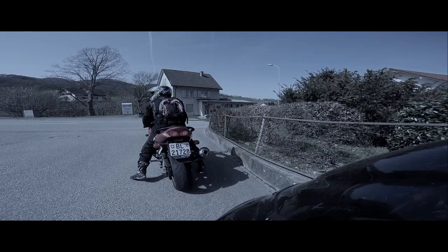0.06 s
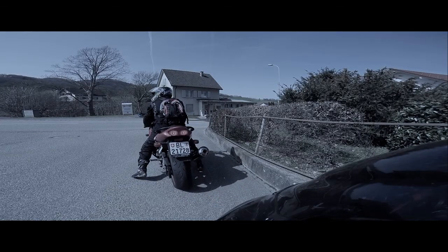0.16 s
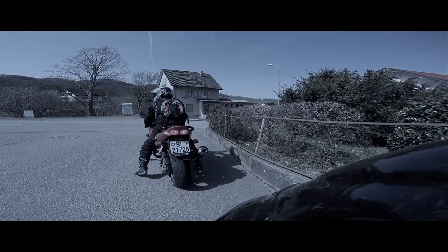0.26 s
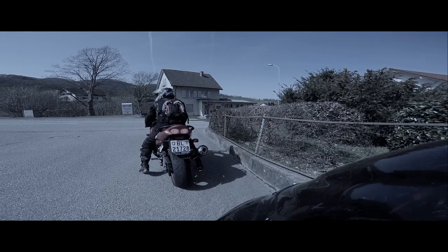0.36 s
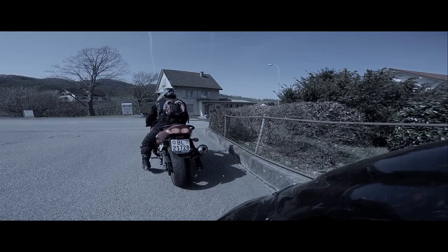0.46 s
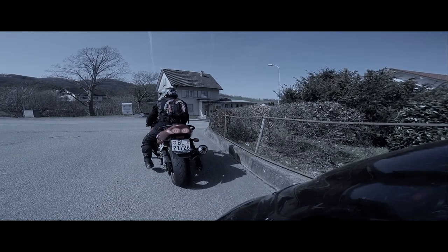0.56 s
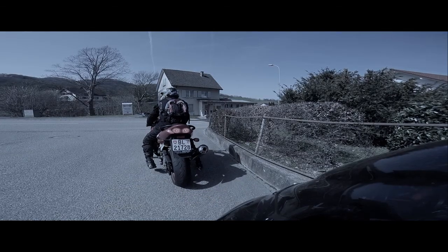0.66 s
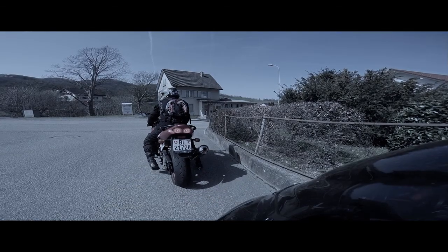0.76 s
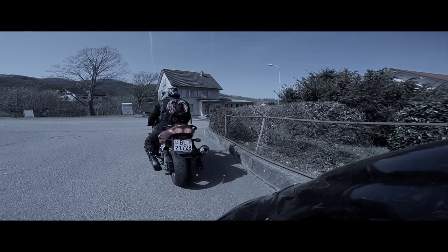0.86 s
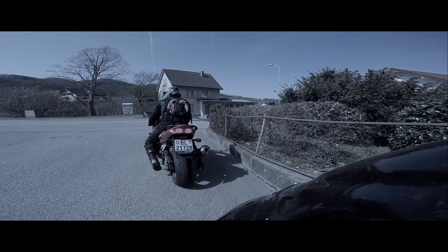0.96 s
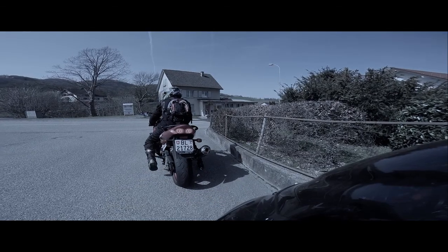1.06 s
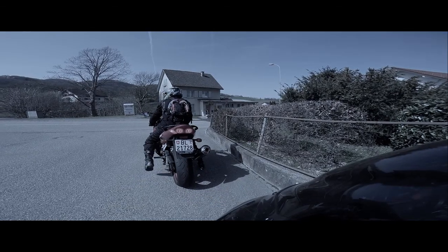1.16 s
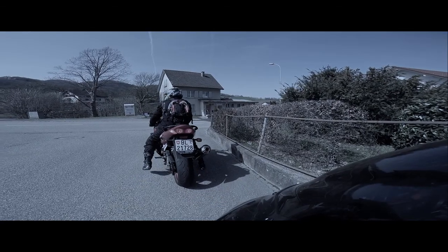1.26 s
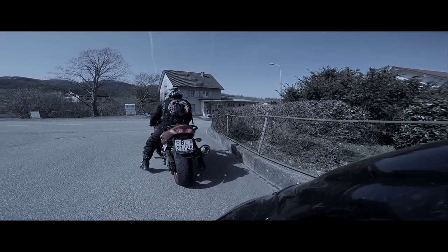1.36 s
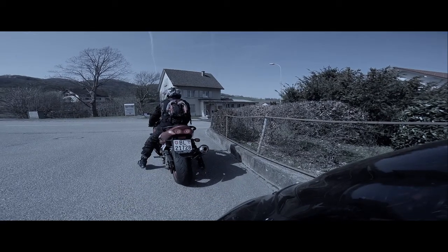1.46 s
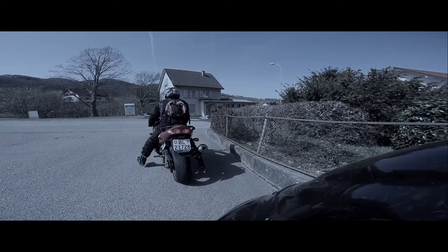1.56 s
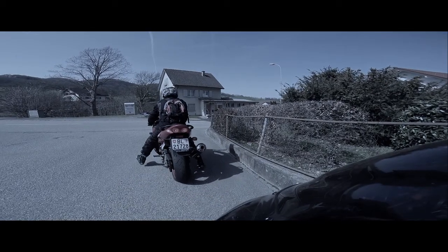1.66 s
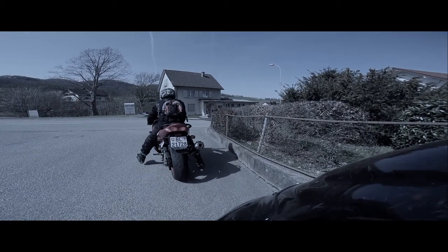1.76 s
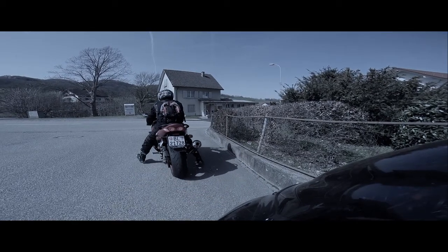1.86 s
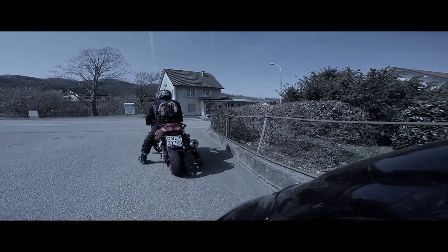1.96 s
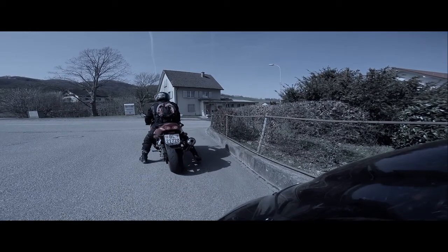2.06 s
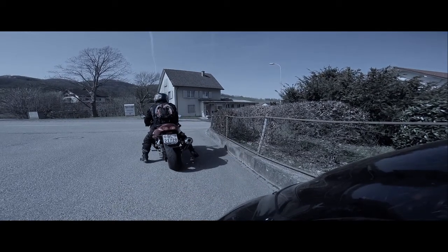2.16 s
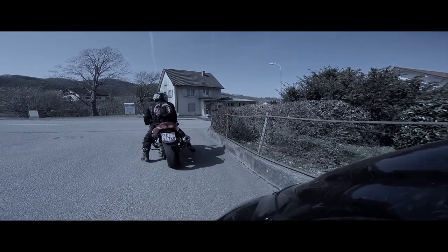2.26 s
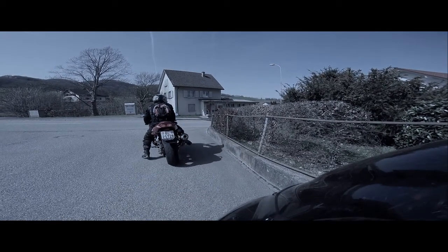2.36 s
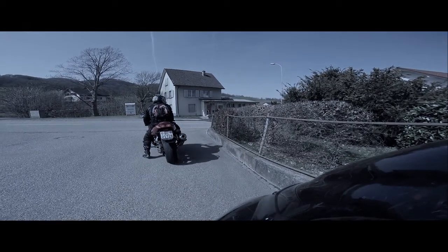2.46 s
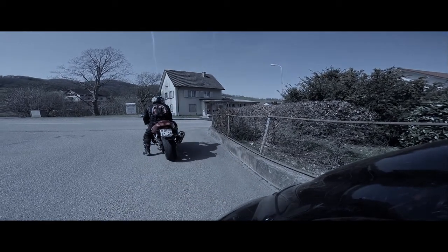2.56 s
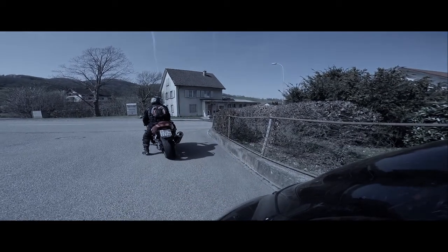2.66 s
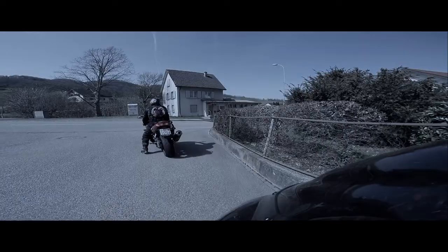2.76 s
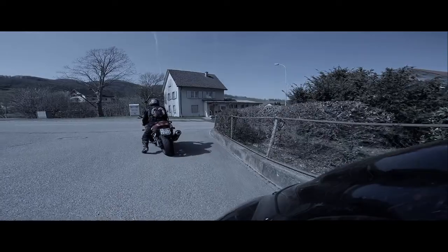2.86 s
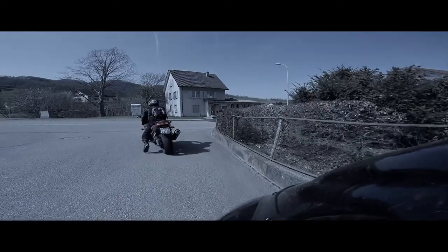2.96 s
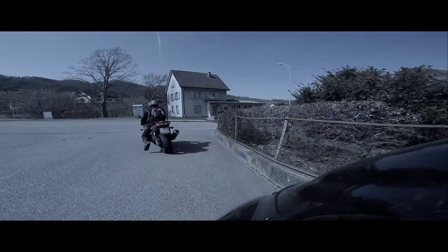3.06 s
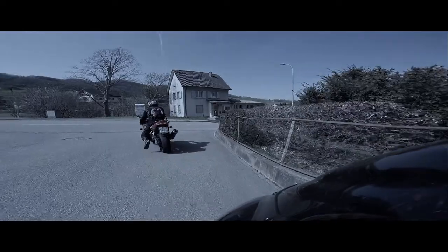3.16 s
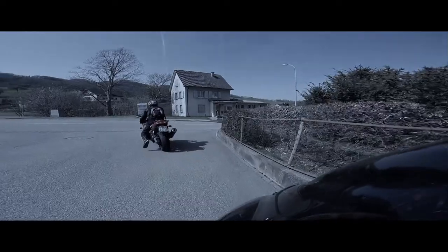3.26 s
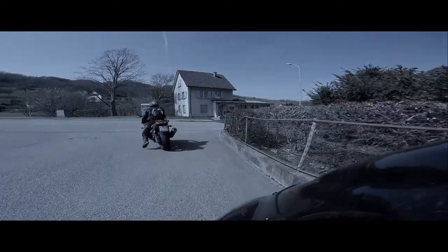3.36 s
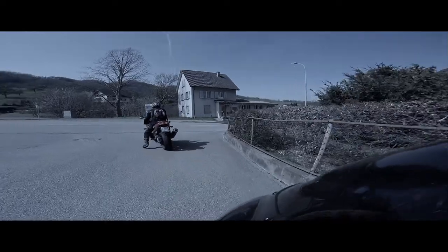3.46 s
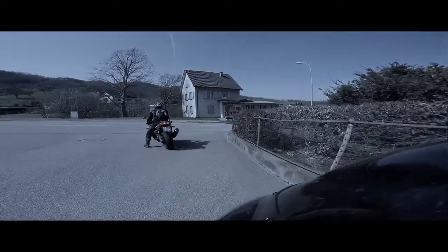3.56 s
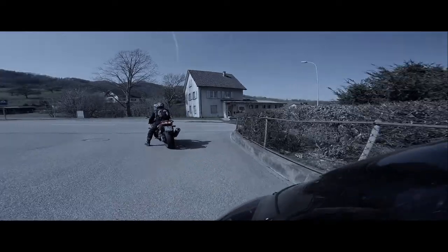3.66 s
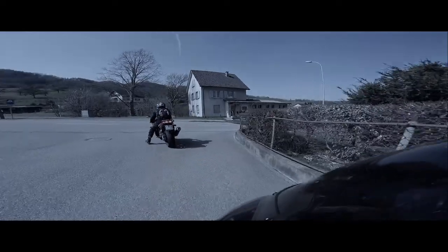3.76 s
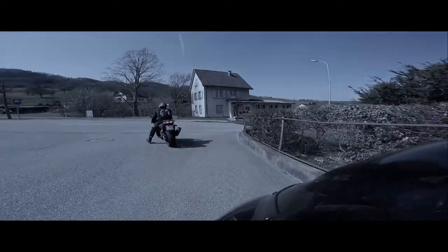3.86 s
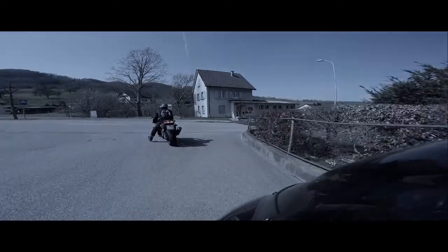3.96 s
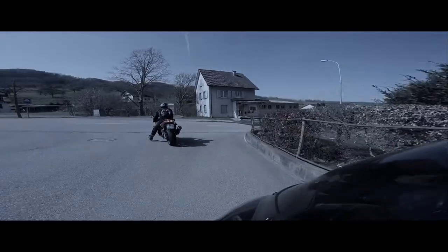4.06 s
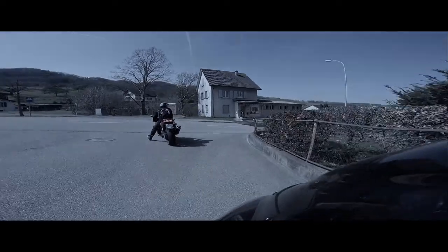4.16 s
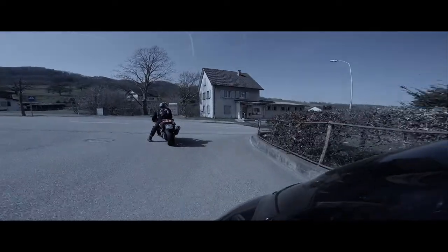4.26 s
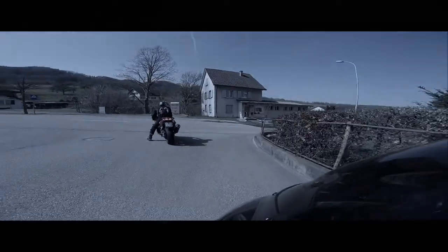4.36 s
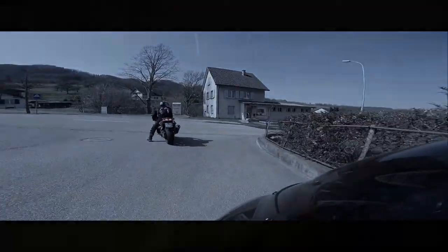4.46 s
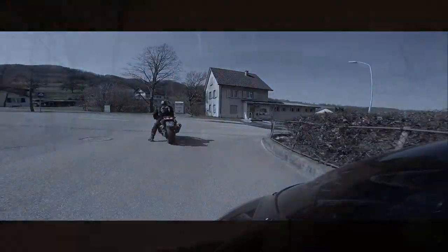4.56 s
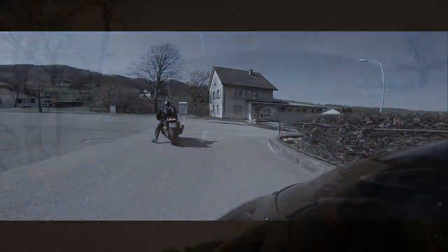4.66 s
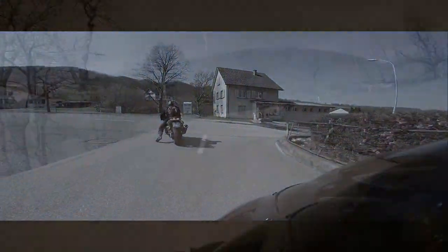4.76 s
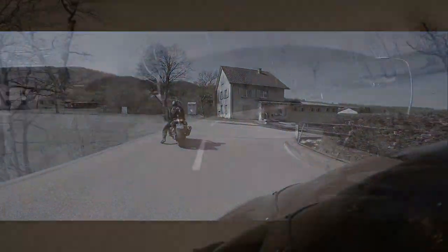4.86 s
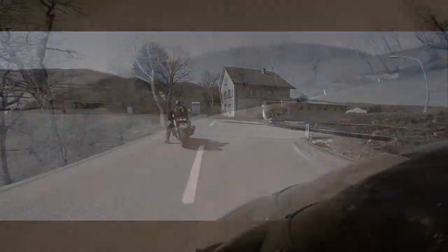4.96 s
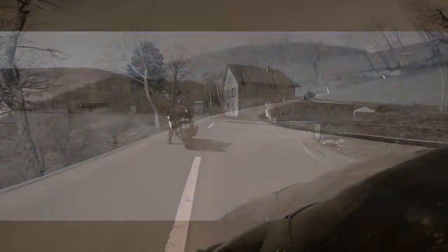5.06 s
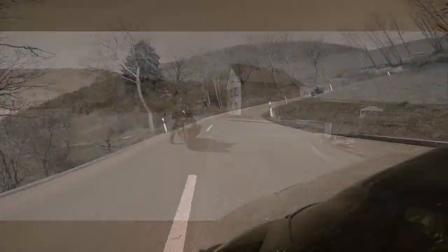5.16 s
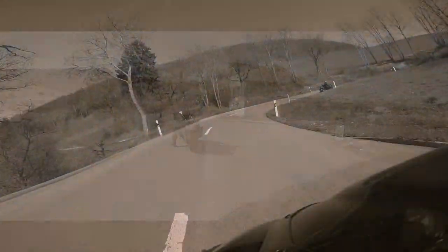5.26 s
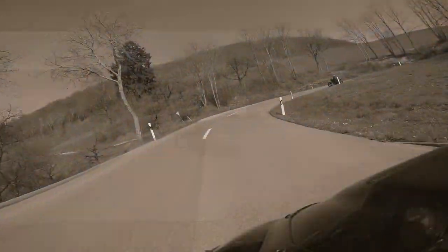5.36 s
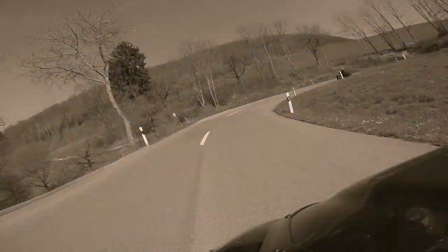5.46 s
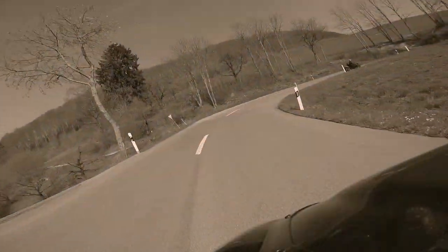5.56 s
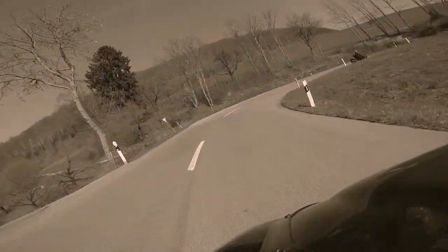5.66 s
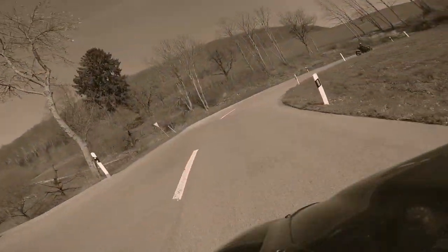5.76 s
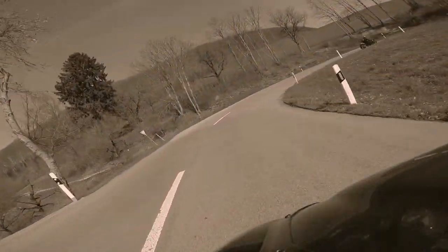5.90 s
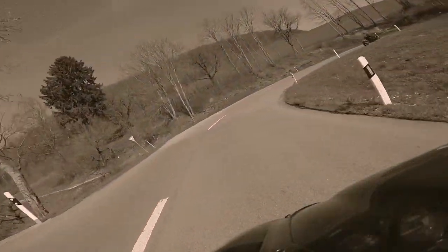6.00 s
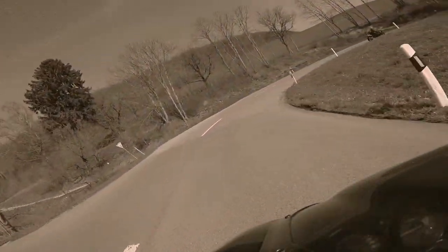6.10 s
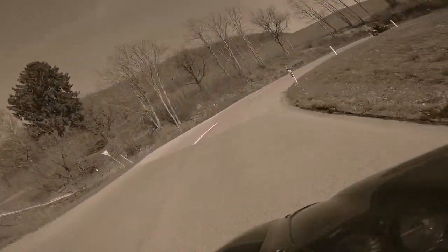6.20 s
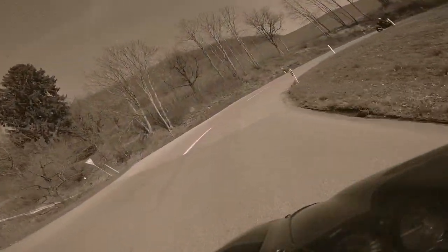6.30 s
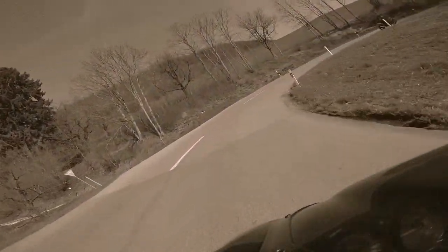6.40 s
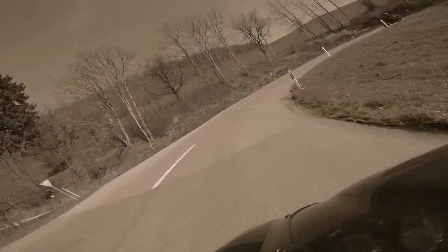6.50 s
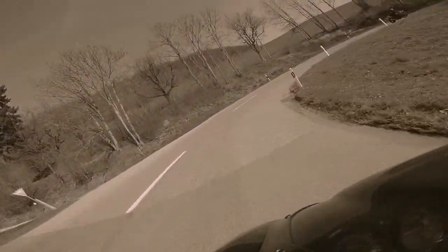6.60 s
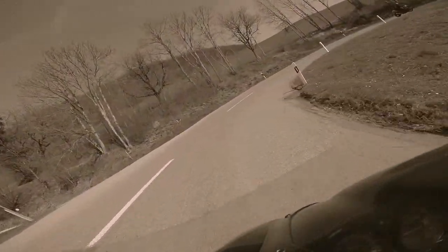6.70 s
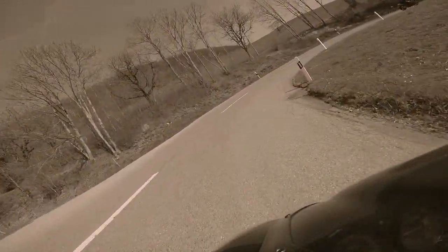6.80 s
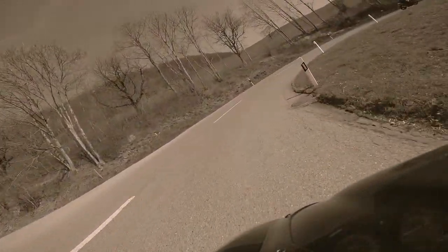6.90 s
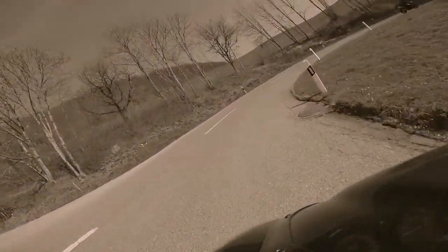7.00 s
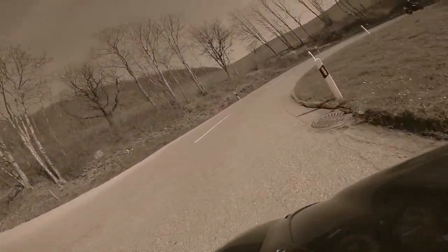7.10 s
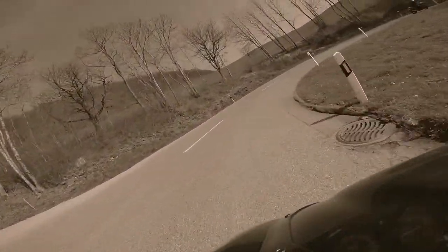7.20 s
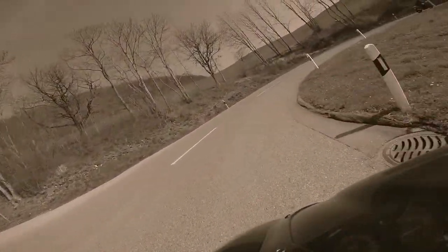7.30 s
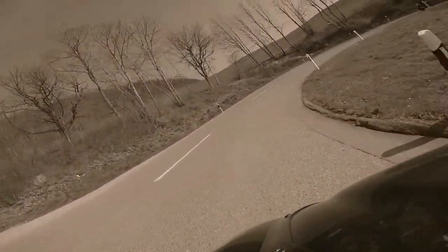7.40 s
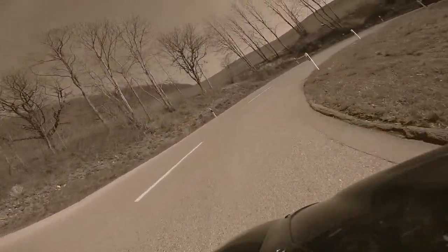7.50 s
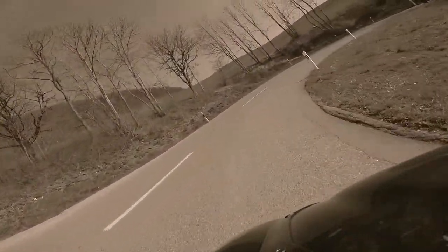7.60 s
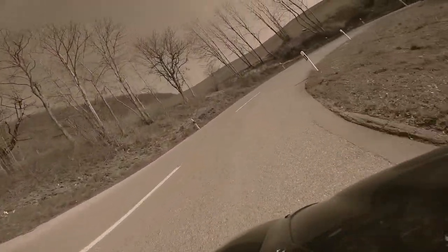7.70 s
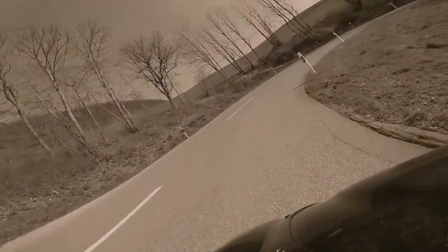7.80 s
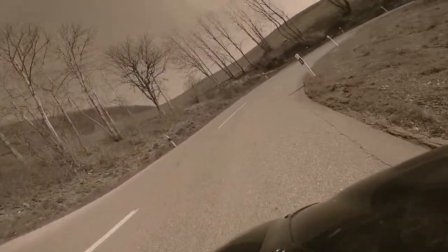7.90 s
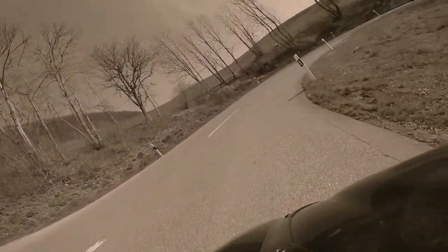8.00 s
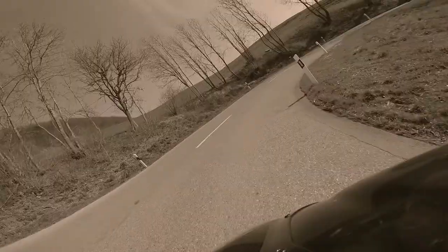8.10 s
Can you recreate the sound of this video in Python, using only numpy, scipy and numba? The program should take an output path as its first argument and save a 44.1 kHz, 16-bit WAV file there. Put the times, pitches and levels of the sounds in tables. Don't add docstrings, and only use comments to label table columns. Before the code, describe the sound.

A motorcycle starter churns, the engine catches, flares and settles to a lumpy idle, then blends into riding with falling, steady and rising revs.

```python
import sys
import numpy as np
from scipy import signal
from scipy.fft import rfft, irfft
from scipy.io import wavfile
from scipy.ndimage import uniform_filter1d, map_coordinates
from numba import njit

SR = 44100
rng = np.random.default_rng(int(sys.argv[2]) if len(sys.argv) > 2 else 0)


def unload_audio(sound):
    columns = np.transpose(np.atleast_2d(sound))
    steps = np.round(np.clip(columns, -1, 1) * 32767)
    wavfile.write(sys.argv[1], SR, steps.astype(np.int16))


def volts_from_decibels(level):
    exponent = np.asarray(level, float) / 20
    return 10 ** exponent


N = 358974
T = np.arange(N) / SR
SHIFT_S = 2.8104


def columns(table):
    s, *rest = np.transpose(table)
    return [np.interp(T, s, column) for column in rest]


def unit(x):
    return x / np.sqrt(np.mean(x ** 2))


def noise():
    return rng.standard_normal(N)


def grit():
    return noise() * volts_from_decibels(1.8 * rng.exponential(size=N))


def colour(x, points):
    hz, db = np.transpose(points)
    size = 8192
    bins_hz = np.arange(size // 2 + 1) * SR / size
    gain_db = np.interp(np.log(bins_hz + 1), np.log(hz), db, left=db[0] - 14.0, right=db[-1] - 34.5)
    cepstrum = irfft(np.log(volts_from_decibels(gain_db)))
    cepstrum[1:size // 2] *= 2
    cepstrum[size // 2 + 1:] = 0
    response = irfft(np.exp(rfft(cepstrum)))
    return unit(signal.fftconvolve(x, response)[:N])


def ring(x, hz, width_hz):
    b, a = signal.iirpeak(hz, hz / width_hz, SR)
    once = signal.lfilter(b, a, x)
    return unit(signal.lfilter(b, a, once))


def walk(rate):
    hold = max(int(SR / 32 / rate), 1)
    coarse = np.repeat(rng.standard_normal(N // (32 * hold) + 2), hold)
    coarse = uniform_filter1d(uniform_filter1d(coarse, hold), hold)
    return np.interp(T, np.arange(len(coarse)) * 32 / SR, unit(coarse))


def bumps(table):
    return sum(db * np.exp(-((T - s) / width) ** 2) for s, db, width in table)


def blows(table, rise_s, fall_s):
    out = np.zeros(N)
    for s, db, *hold in table:
        i = int(s * SR)
        t = T[:int(.15 * SR)][:N - i]
        rise = 1 - np.exp(-t / rise_s)
        fall = np.exp(-np.maximum(t - sum(hold), 0) / fall_s)
        out[i:i + len(t)] += volts_from_decibels(db) * rise * fall
    return out


def riding():
    return np.interp(T, [4.42, 5.38], [0, 1])


def engine(table, share, orders, load_db, load_per_effort, wobble, uneven_db, waver, boom_per_throttle, duck):
    # pitch_hz, level_db
    mount_pass = [(35, -12), (42, -9), (60, -10.5), (66, -19), (78, -21.5), (90, -16.5), (105, -22),
                  (120, -18.5), (190, -22)]
    # centre_s, change_db, half_width_s
    stumbles = [(.405, -12, 0.011), (.45, 3, .025), (.51, -6, 0.03), (1.06, -10, 0.044),
                (2.88, -6.5, 0.028), (3.06, -10, 0.048), (3.11, -15, 0.0128), (3.61, -5, 0.052),
                (3.81, -3, 0.0067), (4.0, -3, 0.01), (4.2, -3.5, 0.048), (4.4, -2, 0.022),
                (5.2, -15, 0.012), (5.43, -2, 0.016), (5.0, 2.5, 0.047), (5.8, -7, 0.034), (5.95, 2, .03),
                (6.14, -3, 0.032), (7.44, -3, 0.014), (7.68, -5, 0.0093), (8.01, -3.5, 0.022)]
    hz, throttle_db = columns(table)
    effort_db = throttle_db + 3 * np.log2(hz / 60)
    pass_hz, pass_db = np.transpose(mount_pass)
    near_db = np.interp(np.log(hz), np.log(pass_hz), pass_db)
    boom_db = near_db + boom_per_throttle * throttle_db + bumps(stumbles)
    phase = 2 * np.pi * np.cumsum(hz * (1 + wobble * walk(25))) / SR
    boom = volts_from_decibels(boom_db + uneven_db * walk(29)) * np.sin(phase)
    rest = 0
    for k, db in orders:
        order_pass_db = np.interp(np.log(k * hz), np.log(pass_hz), pass_db) - pass_db.min()
        through_db = -6.5 * np.abs(np.log2(k * hz / 52)) + 0.37 * order_pass_db
        level = volts_from_decibels(db + through_db + 2.3 * waver * walk(12))
        rest = rest + level * np.sin(k * phase + waver * np.sqrt(k) * walk(8))
    duck_db = duck * (near_db - pass_db.min())
    rest *= volts_from_decibels(load_db + load_per_effort * np.minimum(effort_db, 4.5) - duck_db)
    return np.sqrt(2) * share * (boom + rest), share * boom, effort_db


def walls(running, churn, knocks):
    # pitch_hz, level_db (per Hz)
    wall_spectrum = [(680, -48), (1150, -29), (1180, -38), (1270, -30.5), (1410, -13.5), (1500, -9),
                     (1760, 2.5), (1990, -3), (2290, -14), (2450, -24.5), (2710, -30), (2790, -40.5),
                     (3630, -63), (6140, -120)]
    knock_phase = 2 * np.pi * 1818 * np.cumsum(1 + .07 * walk(60)) / SR
    return colour(grit(), wall_spectrum) * (running + churn) + volts_from_decibels(-5) * knocks * np.sin(knock_phase)


def shell(steady, running, churn, effort_db):
    # pitch_hz, level_db (per Hz)
    shell_spectrum = [(250, -38), (430, -7.5), (538, -15.5), (578, -21), (652, -30.5), (729, 0), (801, -2),
                      (885, 3.5), (972, 1.5), (1050, -8.5), (1200, -37.5), (1560, -37), (2640, -120)]
    # pitch_hz, width_hz, level_db
    shell_modes = [(537.4, 41, -15.5), (743, 150, -12.5), (877, 35, -8)]
    shell_db = -19.5 + 0.3 * walk(17)
    chatter = grit()
    sound = colour(chatter, shell_spectrum) * running * volts_from_decibels(shell_db + 0.28 * walk(33))
    sound += ring(chatter, 880, 200) * volts_from_decibels(-9.5) * churn
    for hz, width_hz, db in shell_modes:
        more_db = 0.78 * effort_db if hz < 600 else 5 * riding()
        sound += ring(noise(), hz, width_hz) * steady * volts_from_decibels(shell_db + db + more_db)
    return sound


def rim(steady, churn, effort_db):
    # pitch_hz, level_db (per Hz)
    rim_spectrum = [(2700, -21.5), (2860, -7.5), (2950, 4.5), (3050, -5), (3380, -15), (4000, -22.5),
                    (5000, -28), (6400, -25), (7200, -40), (9000, -50)]
    chatter = grit()
    sound = colour(chatter, rim_spectrum) * (steady + churn) * volts_from_decibels(-33.5 + 2.0 * walk(50))
    return sound + ring(chatter, 2750, 500) * steady * volts_from_decibels(-43.5 + 1.5 * effort_db)


def latch(running):
    # start_s, peak_db, length_s
    buzzes = [(4.87, -44.5, 0.023), (4.926, -44, 0.022), (5.026, -41.5, 0.021), (5.062, -42, 0.023),
              (5.1124, -40, 0.021), (5.1377, -48, 0.02), (5.1976, -41, 0.022), (5.233, -39.5, 0.027),
              (5.265, -37.5, 0.03), (5.3, -39.5, 0.028), (5.332, -39.5, 0.025), (5.3822, -38.5, 0.019),
              (5.4245, -39.5, 0.016), (5.473, -45, 0.022), (5.525, -49, 0.022), (5.565, -51.5, 0.016),
              (5.7014, -52, 0.022), (5.736, -48, 0.028)]
    latch_db = -50 + 3.5 * walk(20)
    buzz_db = 4.5 * walk(110)
    buzz = volts_from_decibels(-13 + buzz_db) * blows(buzzes, .002, 0.014)
    chatter = grit()
    haze = ring(chatter, 9800, 4000) * volts_from_decibels(-24) * uniform_filter1d(buzz, size=4096)
    bursts = ring(ring(chatter, 5700, 800), 5850, 800) * buzz
    ticks = ring(chatter, 5800, 330) * running * volts_from_decibels(latch_db - 6.5 + .5 * buzz_db)
    return haze + bursts + ticks


def starter(churn):
    gear = ring(noise(), 6420, 130) * churn * volts_from_decibels(-43)
    body = ring(noise(), 270, 220) * churn * volts_from_decibels(-25)
    return gear + body


def case(swing, effort_db, caught):
    # start_s, peak_db, length_s
    churns = [
        (0.0, -6.5, 0.0098),
        (0.084, -22, 0.054),
        (0.198, -19, 0.049),
        (0.301, -16.5, 0.038),
    ]
    # start_s, peak_db
    hard_knocks = [(0.3753, -4), (0.5945, -10), (0.7244, -10.5), (1.9235, -8), (2.0752, -13), (3.1161, -5),
                   (3.3275, -12), (3.3785, -20.5), (3.93, -10.5), (5.0946, -7), (5.1753, -18),
                   (5.5451, -23.5), (5.621, -10), (5.8258, -10.5), (6.094, -6.5), (6.1257, -24),
                   (6.2658, -11), (6.4048, -7.5), (6.494, -11), (6.8621, -3.5), (6.9683, -8),
                   (7.1494, -26.5), (7.2542, -23), (7.6153, -17), (7.676, -8), (7.7427, -4.5),
                   (7.7977, -13.5), (7.979, -20), (8.0153, -9), (8.053, -4)]
    churn = blows(churns, 0.00073, 0.0068)
    knocks = blows(hard_knocks, .0007, .006)
    swing_size = np.sqrt(np.maximum(uniform_filter1d(swing ** 2, size=2048), 1e-5))
    stroke = swing / swing_size
    ends = volts_from_decibels(2.1 * np.clip(stroke, -2, 2) + 0.9 * np.clip(stroke ** 2, 0, 3))
    steady = caught * volts_from_decibels(-22.5 + effort_db + 1.1 * walk(12))
    running = steady * volts_from_decibels(-1.5 + 0.29 * walk(50)) * ends + volts_from_decibels(-12.5) * knocks
    sound = walls(running, churn, knocks) + shell(steady, running, churn, effort_db)
    return sound + rim(steady, churn, effort_db) + latch(running) + starter(churn)


def mount():
    # centre_s, lift_db, half_width_s
    jolts = [
        (.45, 9.5, .04),
        (.64, 13, .08),
        (.9, 5.5, 0.035),
        (3.1, 14, 0.12),
    ]
    idle_db, road_db = -33.5, -22.5
    db = idle_db + (road_db - idle_db) * riding() + bumps(jolts)
    return ring(noise(), 40, 8.2) * volts_from_decibels(db)


def rumble(effort_db, caught):
    # pitch_hz, level_db (per Hz)
    frame_spectrum = [(18, -4), (30, 23.5), (45, 33), (70, 17), (110, 20.5), (200, 10.5), (300, 5.5),
                      (360, -3), (480, -11), (650, -12)]
    idle_db, road_db = -45, -43
    rumble_db = idle_db + (road_db - idle_db) * riding() + 1.1 * effort_db + 1.7 * walk(15)
    return colour(noise(), frame_spectrum) * volts_from_decibels(rumble_db + 14.0 + .6 * walk(12)) * caught


def scene():
    # time_s, firing_rate_hz, throttle_db
    start_revs = [(.36, 39.62, 6.5), (.46, 56, 4.5), (.55, 133, 6), (.62, 187.4, 2), (.8, 144.6, 1.5),
                  (.95, 118.4, 0.5), (1.13, 92.93, 0), (1.4, 65, 0.5), (1.6, 53.3, -2), (1.8, 48.3, -1.5),
                  (2.79, 45.6, -1.5), (3.1, 34.89, 1), (3.25, 37.4, 3.5), (3.53, 42.89, -1.5),
                  (3.78, 40, -0.5), (4.03, 43.6, 0), (4.3, 40.63, 0.5), (4.47, 45.5, -0.5)]
    ride_revs = [(4.5, 107.8, -6.5), (5.06, 104.9, -1.5), (5.26, 99.54, -1), (5.5, 86.21, 0.5),
                 (5.77, 66.69, 2), (5.92, 63.78, 1.5), (6.02, 57.86, 0), (6.22, 59.12, -0.5),
                 (6.66, 59.19, -0.5), (6.78, 57.24, -0.5), (7.4, 55.41, -0.5), (7.6, 59.74, 0.5),
                 (7.67, 73.17, 1), (7.75, 84.3, 3), (7.9, 103.1, 1), (8.03, 110.9, 2), (8.14, 121.5, 3.5)]
    # multiple (of the rate), level_db
    start_orders = [(0.25, -4), (0.5, -5), (1.5, -10), (2, 5.5), (2.5, -8.5), (3, -4), (4, -9), (5, -4.5)]
    ride_orders = [(0.5, -16.5), (1.5, -3), (2, 4.5), (2.5, -10.5), (3, 4), (4, -6.5), (4.5, -12), (5, -9)]
    mix = riding()
    fired = np.clip((T - .36) / 0.06, 0, 1) * (1 - mix)
    idle, swing_a, effort_a = engine(start_revs, fired, start_orders, -32.5, .7, wobble=.01, uneven_db=1.4,
                                     waver=0.44, boom_per_throttle=0.078, duck=0.73)
    ride, swing_b, effort_b = engine(ride_revs, mix, ride_orders, -32, .4, wobble=.005, uneven_db=1.2,
                                     waver=0.22, boom_per_throttle=1.7, duck=0.091)
    effort_db = effort_a + (effort_b - effort_a) * mix
    caught = np.interp(T, [.35, .4], [volts_from_decibels(-10.5), 1])
    shaken = case(swing_b - swing_a, effort_db, caught) + rumble(effort_db, caught)
    return (idle + ride + mount() + shaken)[None]


@njit
def limiter(x, top, share, attack, release):
    y, crest = np.empty(len(x)), 0.
    for i in range(len(x)):
        a = abs(x[i])
        crest += (a - crest) * (attack if a > crest else release)
        y[i] = x[i] * (top / max(crest, top)) ** share
    return y


def slips():
    frame_rate = 30000 / 1001
    late = T > SHIFT_S
    grid_start = np.where(late, .487, .187)
    frame = np.floor(T * frame_rate - grid_start).astype(int) + late
    flips = frame - (frame + 1) // 5
    return (flips % 2 - .5) * np.clip((4.98 - T) / 0.19, 0, 1)


def low_pass(x):
    return signal.sosfilt(signal.butter(12, 15870, fs=SR, output="sos"), x)


def record(dry):
    x = limiter(dry[0] + volts_from_decibels(-100) * noise(), 0.48, 0.3, .5, 0.0011)
    over = np.maximum(np.abs(x) - .66, 0)
    x = x - np.sign(x) * (over - .25 * np.tanh(over / .25))
    x = signal.sosfilt(signal.butter(6, 10000, fs=SR, output="sos"), x)
    x = map_coordinates(x, [np.arange(N) + 1.05 * slips()], order=3, mode="nearest")
    x = x - .09 * (T > SHIFT_S) * np.exp(-np.abs(T - SHIFT_S) / .004)
    return low_pass(x[None])


dry = scene()
out = record(dry)
unload_audio(out)
```